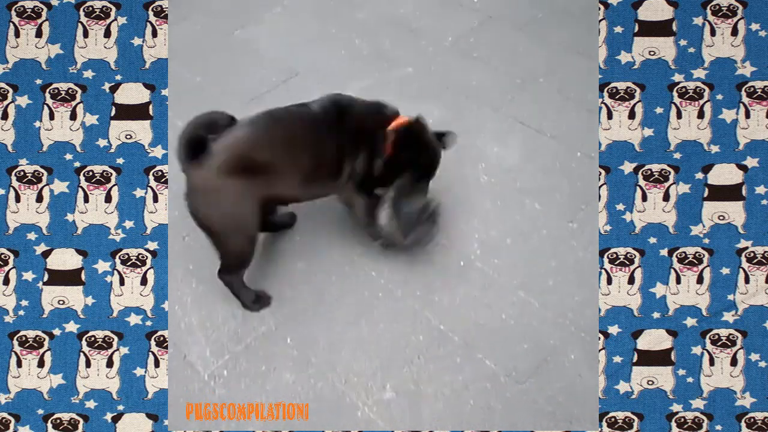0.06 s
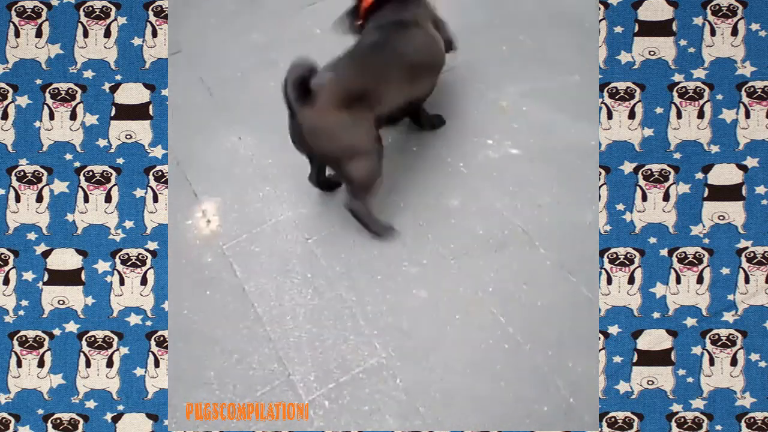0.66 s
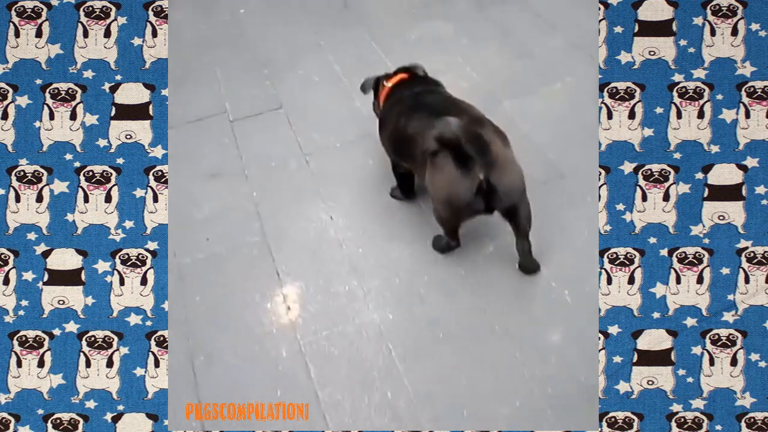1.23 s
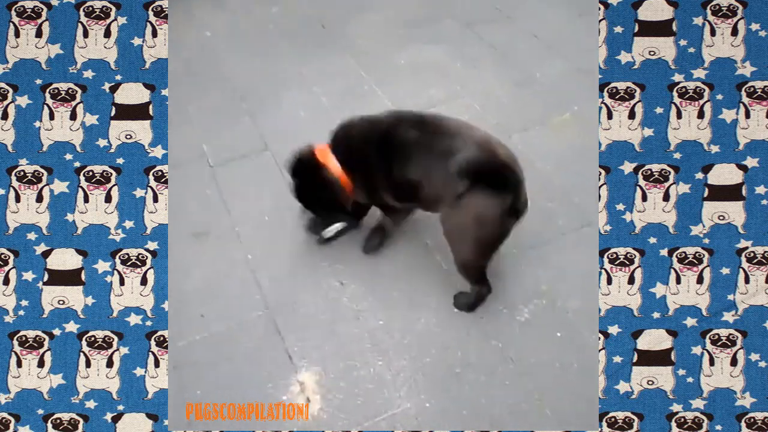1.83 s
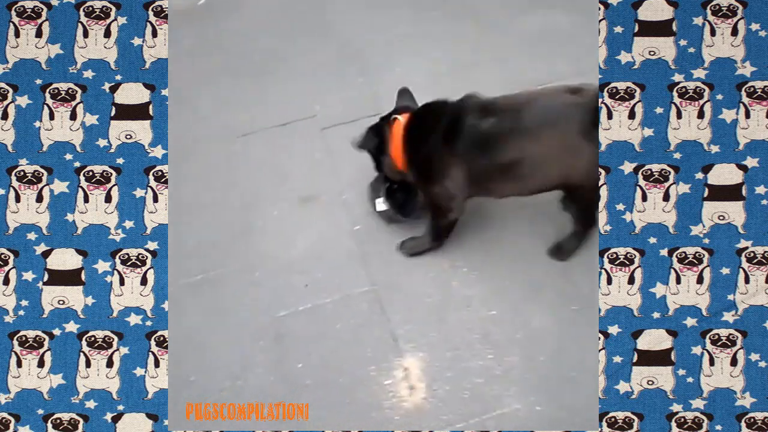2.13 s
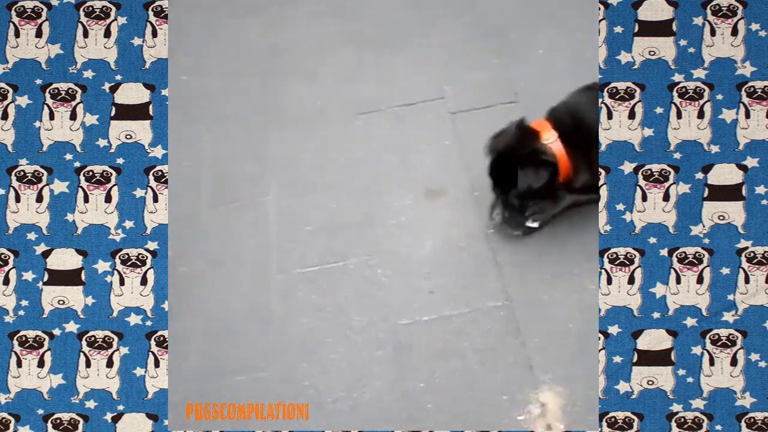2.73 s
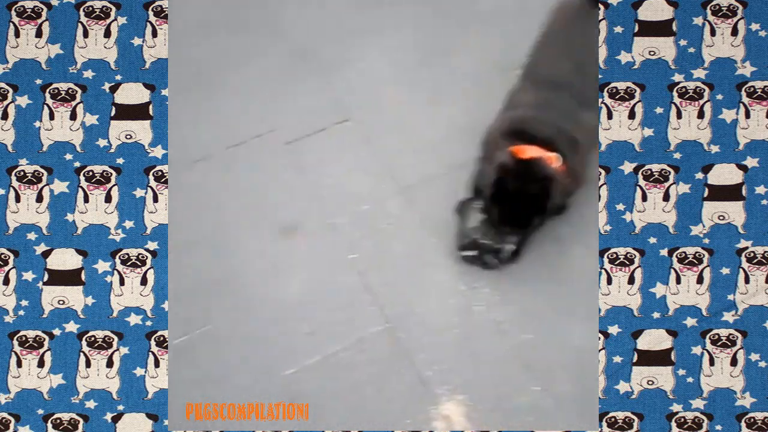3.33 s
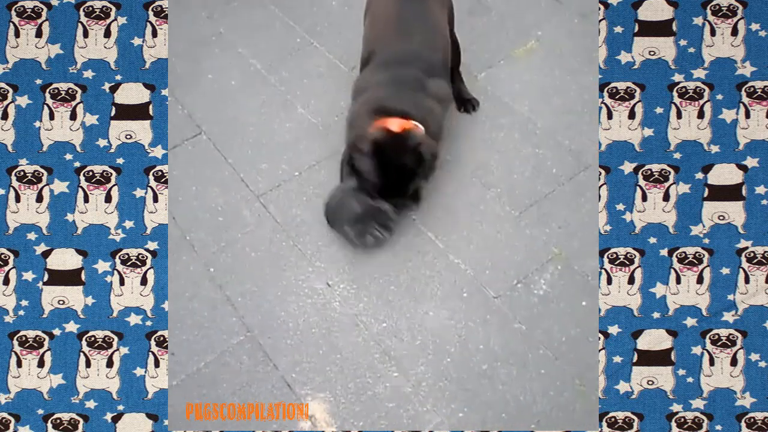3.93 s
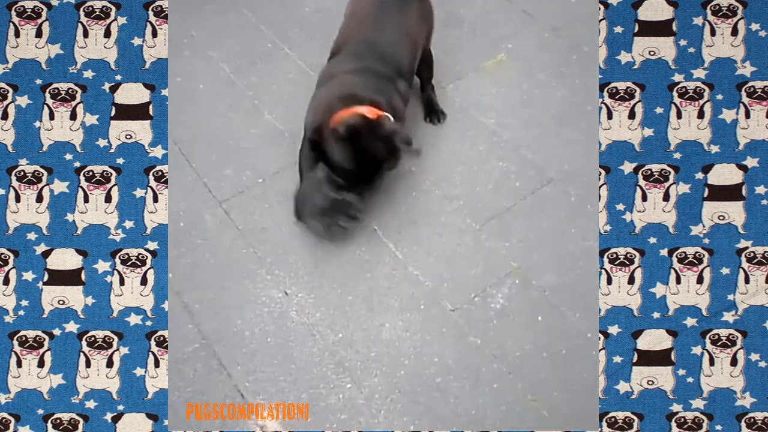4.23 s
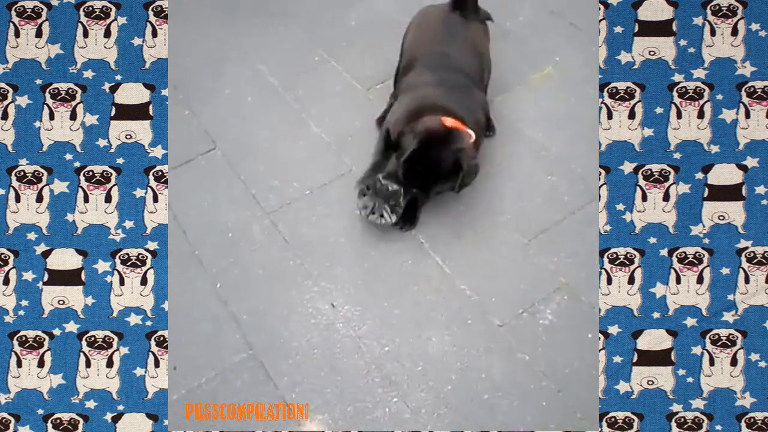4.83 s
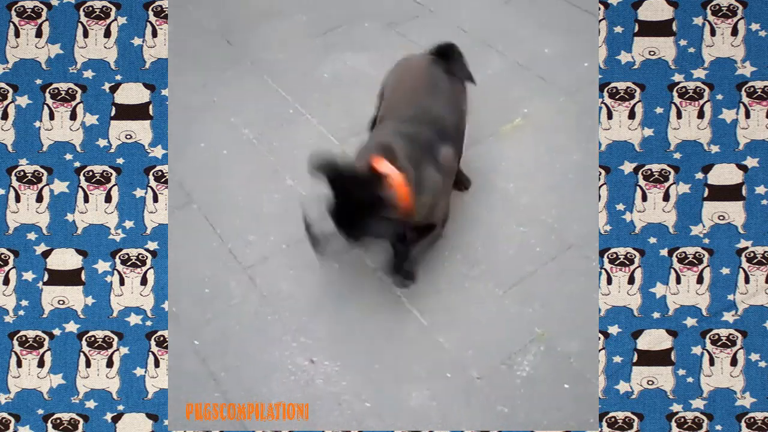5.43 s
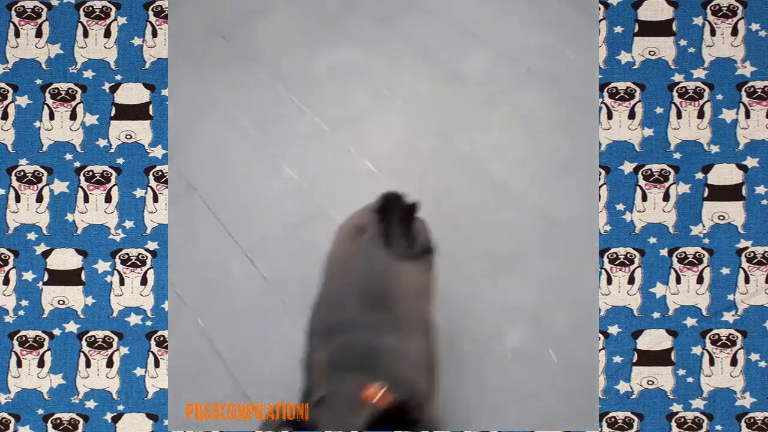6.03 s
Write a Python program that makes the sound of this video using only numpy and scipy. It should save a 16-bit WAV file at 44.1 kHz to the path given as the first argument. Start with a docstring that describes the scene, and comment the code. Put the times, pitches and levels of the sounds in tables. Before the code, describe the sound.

A small dog pushes a thin plastic cup over paving stones, with short gritty scrapes, light knocks and crackles.

```python
"""Dog pushing a cup round a yard

Close to the microphone, a small dog shoves a thin plastic cup over paving stones. The rim rasps over
the grit in short strokes and now and then squeaks on one note; between strokes the cup knocks and
crackles. Rasp and knocks sound through the cup's damped wall modes. The ground and the yard walls
throw back short echoes, and a low outdoor rumble lies underneath."""
import sys
import numpy as np
from scipy import signal
from scipy.fft import rfft, irfft
from scipy.io import wavfile

SR = 44100
rng = np.random.default_rng(int(sys.argv[2]) if len(sys.argv) > 2 else 0)


def unload_wav(signal):
    """Save mono or channel-first audio to the path in sys.argv[1] as 16-bit WAV at rate SR, clipped to [-1, 1]."""
    wavfile.write(
        sys.argv[1],
        SR,
        np.round(np.clip(np.atleast_2d(signal).T, -1, 1) * 32767).astype(np.int16),
    )


N = 272405
TIME = np.arange(N) / SR

# The cup's four registers: hollow, wall, rasp, grit hiss. Brightness favours hiss over hollow; body
# lifts the thin wall. (low edge [Hz], high edge [Hz], share of brightness, share of body)
REGISTERS = [(212, 702, -0.63, 0), (713, 1740, -0.099, 0.93), (1943, 5500, 0.31, 0.94),
             (6160, 32300, 0.54, 0.22)]


def from_db(db):
    """Decibels to gain."""
    return 10 ** (np.asarray(db) / 20)


def rms_one(x):
    """Scale to rms 1."""
    return x / np.sqrt(np.mean(x ** 2) + 1e-20)


def band(x, low_hz, high_hz, order=2):
    """Causal band-pass, its upper edge held below half the sample rate."""
    edges_hz = [low_hz, min(high_hz, SR / 2 - 1000)]
    return signal.sosfilt(signal.butter(order, edges_hz, "band", fs=SR, output="sos"), x + 1e-18)


def coloured_noise(spectrum):
    """Steady noise shaped by (Hz, dB) points and rolled off above the last; rms 1."""
    hz, level_db = np.transpose(spectrum)
    bins_hz = np.maximum(np.arange(N // 2 + 1) * SR / N, 1)
    gain = from_db(np.interp(np.log(bins_hz), np.log(hz), level_db))
    gain /= 1 + (bins_hz / (2 * hz[-1])) ** 2
    return rms_one(irfft(rfft(rng.standard_normal(N)) * gain, N))


def drift(rate_hz):
    """A smooth random wander that changes about rate_hz times a second; rms 1."""
    r = np.exp(-2 * np.pi * rate_hz / SR)
    return rms_one(signal.lfilter([1], [1, -2 * r, r * r], rng.standard_normal(N)))


def resonate(x, hz, width_hz):
    """One resonance with gain 1 at its peak."""
    r = np.exp(-np.pi * width_hz / SR)
    feedback = [1, -2 * r * np.cos(2 * np.pi * hz / SR), r * r]
    return signal.lfilter(np.array([1, 0, -1]) * (1 - r * r) / 2, feedback, x)


def yard():
    """The bed of the place: outdoor rumble and a soft wash of background noise."""
    # Course of the ambience: (time [s], rumble level [dB], wash level [dB])
    levels = [(0.0, -45, -40), (0.15, -52, -54), (0.27, -53, -53.5), (0.799, -46, -49), (1.15, -45, -46.5),
              (2.3, -45.5, -43.5), (2.92, -46, -48), (3.4, -47.5, -47), (3.8, -46.5, -48),
              (6.18, -46.5, -47.5)]
    # Spectrum of the rumble: (frequency [Hz], relative density [dB])
    rumble_spectrum = [(11, -2.5), (18, -2), (43, 5.5), (82, -2), (103, -7.5), (118, -10), (172, -22),
                       (200, -8.5), (260, -46), (440, -120)]
    # Spectrum of the wash: (frequency [Hz], relative density [dB])
    wash_spectrum = [(65, -22), (110, -1), (669, -7), (740, -7), (853, -5.5), (1090, -8.5), (1420, -9.5),
                     (1840, -16), (3250, -19.5), (3750, -19), (8780, -23.5), (14000, -19.5)]
    times, rumble_db, wash_db = np.transpose(levels)
    rumble = from_db(np.interp(TIME, times, rumble_db)) * coloured_noise(rumble_spectrum)
    wash = from_db(np.interp(TIME, times, wash_db)) * coloured_noise(wash_spectrum)
    return rumble + wash


def microphone_flutter(at_s, half_s, level_db, low_hz, high_hz):
    """One brief low flutter on the microphone."""
    swell = np.exp(-((TIME - at_s) / half_s) ** 2 / 2)
    return from_db(level_db) * swell * rms_one(band(rng.standard_normal(N), low_hz, high_hz))


def yard_echoes(x, tail_db, t60_s, dull_hz):
    """What the yard sends back to the microphone: early echoes and a short, dull scatter."""
    # Reflections off the ground and the walls: (delay [s], gain)
    echoes = [(.0043, 0.11), (0.0122, 0.11), (0.0133, 0.11), (0.0225, 0.053), (0.031, 0.034)]
    age = TIME[:SR // 2]
    fade_in = np.clip(age / .008, 0, 1)
    response = rng.standard_normal(len(age)) * from_db(-60 * age / t60_s) * fade_in
    response *= from_db(tail_db) / np.sqrt(np.sum(response ** 2))
    for delay_s, gain in echoes:
        response[int(delay_s * SR)] += gain
    response = signal.sosfilt(signal.butter(1, dull_hz, fs=SR, output="sos"), response)
    return signal.fftconvolve(x, response)[:N]


def cup(force):
    """The thin wall passes every frequency and rings briefly at its modes."""
    # Wall modes and the notches between them: (frequency [Hz], width [Hz], lift [dB])
    modes = [(236, 124, -6.5), (399, 134, 8), (520, 30, -5), (670, 20, 1.5), (773, 91, 4), (1080, 46, -2.5),
             (1060, 143, 8), (1252, 93, 5.5), (1453, 11.5, 11), (1650, 94, 1.5), (2424, 190, 4),
             (2710, 200, 4), (3195, 540, 4), (3560, 65, -0.5), (4500, 200, 2.5), (4900, 1800, 1.5),
             (12800, 1900, 3)]
    for hz, width_hz, lift_db in modes:
        force = force + (from_db(lift_db) - 1) * resonate(force, hz, width_hz)
    return force


def grit(grains_per_s, size_db, catch_db, catch_hz):
    """Grains of stone flick the rim at random, in clumps as it catches and slips."""
    clumps = from_db(catch_db * np.clip(drift(catch_hz), -2, 2))
    sizes = from_db(size_db * np.minimum(rng.exponential(1, N), 4))
    hits = rng.random(N) < grains_per_s / SR
    return hits * rng.choice([-1, 1], N) * sizes * clumps


def shoves(brightness_share, body_share):
    """Drive of one register: each shove bites, swells as the cup tips to a new colour, then coasts."""
    # The dog's shoves: (start [s], rise [s], fall [s], crest [dB], brightness at first touch [dB],
    # brightness at the crest [dB], body [dB])
    strokes = [(0.024, 0.07, 0.08, -41, 13, -2.5, -8.5), (0.109, 0.011, 0.032, -33.5, 2, 16, 1),
               (0.455, 0.028, 0.057, -33.5, 12, 5.5, 1), (0.568, 0.027, 0.029, -26.5, -9, 8.5, -3),
               (0.951, .024, .051, -36.5, -29, -4, 7), (1.04, 0.057, 0.038, -33, -10, 6, 4),
               (1.466, 0.048, 0.048, -35, -10, 8.5, 9), (1.578, 0.02, 0.2, -41.5, -12, 0.5, 4.5),
               (1.682, 0.012, 0.06, -37, 14, 22.5, -1.5), (1.739, 0.021, 0.045, -32.5, 8, 6, -6),
               (1.814, 0.08, 0.069, -30, -3.5, -5.5, 6.5), (1.879, 0.068, 0.033, -28, 17, 22, 2.5),
               (1.99, 0.064, 0.096, -30.5, 16, 2, -2.5), (2.103, 0.096, 0.018, -48, -25, 6, 5),
               (2.231, 0.077, 0.51, -46, 8, -2.5, -1.5), (2.402, 0.023, 0.055, -47.5, -6, -7, 7.5),
               (2.564, 0.079, .033, -49.5, 16, -16, -1), (2.685, 0.077, 0.027, -42.5, 4, 0.5, 4),
               (2.774, 0.04, .046, -45, -14, -6, 9.5), (3.018, 0.0073, 0.071, -28, -13, 5.5, -1.5),
               (3.163, 0.025, .053, -40, 10, 1, 3.5), (3.206, 0.06, .097, -31, -5, -5, 6),
               (3.441, 0.038, 0.18, -46.5, 14, -6, 1.5), (3.598, .029, 0.087, -47.5, 11, -9, 5),
               (3.817, 0.062, 0.14, -44, -1, -2.5, 2), (4.094, 0.073, .12, -41, 1, 5.5, -1.5),
               (4.33, .11, 0.039, -50, 12, -9, 8), (4.576, .035, 0.077, -36.5, 6, -11, 7),
               (4.693, 0.03, 0.16, -42, 9, -2.5, 6.5), (4.788, 0.043, .043, -42, 13, -8, 1),
               (4.886, 0.077, 0.051, -34.5, -1, -1, 2.5), (5.098, .047, .073, -25.5, 6, -0.5, 1),
               (5.183, 0.024, 0.018, -32.5, -6, -2.5, 2), (5.348, 0.046, 0.085, -24.5, 5, 1.5, -5.5),
               (5.394, 0.051, 0.019, -28.5, 25, 10.5, 6.5), (5.594, 0.034, 0.033, -53, 8, 19, 2.5),
               (5.728, 0.033, 0.24, -50, 4, 13.5, -7)]
    swell_db, fall_db, touch_s = 14, 19.5, 0.0027
    power = np.zeros(N)
    for start_s, rise_s, fall_s, crest_db, first_db, last_db, body_db in strokes:
        on = (TIME > start_s) & (TIME < start_s + rise_s + 3 * fall_s)
        age = TIME[on] - start_s
        touch = np.minimum(age / touch_s, 1)
        tipped = np.clip(age / rise_s, 0, 1)
        coasted = np.maximum(age - rise_s, 0) / fall_s
        # Powers above 1 round the crest.
        push_db = crest_db - swell_db * (1 - tipped) ** 1.45 - fall_db * coasted ** 1.14
        bite_db = 7.5 * np.exp(-age / 0.0049)  # the rim digs in as it touches down
        brightness_db = first_db + (last_db - first_db) * tipped
        colour_db = brightness_share * brightness_db + body_share * body_db
        power[on] += (touch * from_db(push_db + bite_db + colour_db)) ** 2
    return np.sqrt(power)


def loose_grit(level_db, low_hz, high_hz, linger_s):
    """Stray grains tick faintly under the cup and the paws while the dog is busy with it."""
    pole = np.exp(-1 / (linger_s * SR))
    push = signal.lfilter([1 - pole], [1, -pole], shoves(brightness_share=0, body_share=0))
    busy = np.minimum(push / from_db(-46), 1) ** 0.6
    ticks = grit(grains_per_s=160, size_db=2.2, catch_db=2.5, catch_hz=12)
    return from_db(level_db) * busy * rms_one(band(cup(ticks), low_hz, high_hz))


def brief_tones(gain_db):
    """Brief narrow tones: squeaks in the scrapes, rings after knocks, a low thump and a thin hiss."""
    # Brief tones: (centre time [s], half length [s], pitch [Hz], width [Hz], relative level [dB])
    tones = [(0.022, 0.00078, 2900, 450, -17), (1.482, 0.014, 1270, 100, -43),
             (1.765, 0.0091, 1910, 346, -29.5), (1.894, 0.013, 1110, 130, -20),
             (1.946, 0.0037, 1173, 99, -16.5), (1.939, 0.012, 5100, 432, -19.5),
             (3.035, 0.0064, 425, 111, -20), (3.04, 0.008, 3030, 696, -22), (3.264, 0.049, 1146, 86, -30.5),
             (3.965, 0.0024, 870, 217.4, -21), (4.634, 0.023, 1165, 97, -29),
             (4.753, 0.011, 2510, 402, -32), (5.153, 0.04, 1490, 74, -40), (5.411, 0.017, 655, 44.5, -26.5),
             (5.407, 0.021, 145, 90, -29.5), (5.781, 0.034, 4660, 497, -43.5)]
    out = np.zeros(N)
    for at_s, half_s, hz, width_hz, level_db in tones:
        near = np.abs(TIME - at_s) < 4 * half_s
        swell = np.exp(-((TIME[near] - at_s) / half_s) ** 2 / 2)
        noise = rng.standard_normal(N)[near]
        tone = resonate(resonate(noise, hz, 2 * width_hz), hz, 2 * width_hz)
        out[near] += from_db(level_db + gain_db) * swell * rms_one(tone)
    return out


def knocks(register_db, crackle, ring_db, size=2048):
    """Blows, sharp or soft, each with a short crackle; the struck spot rings at its own pitch."""
    # The cup hits the stone or its wall snaps:
    # (time [s], ring pitch [Hz], relative level [dB], brightness [dB], body [dB])
    blows = [(0.02, 2890, -35.5, -2.5, 12.5), (0.1026, 6960, -41, 28, 7.5), (0.1161, 2970, -37.5, 0, 4),
             (0.1234, 11500, -35.5, 22.0, 8.5), (0.4565, 2880.0, -48, 14, 3), (0.4872, 2550.0, -50, 6, 14),
             (0.548, 1100.0, -43, -16, 6.0), (0.5695, 1400, -36.0, 9, 3.5), (0.707, 1840, -57.5, -15, 20),
             (0.952, 1236, -40.5, -1, 3.0), (0.9761, 900.0, -44, -6.0, 14), (1.4719, 1120.0, -49, -18, 0),
             (1.4866, 1270, -41.5, -15, 13.5), (1.6822, 8980, -35, 4.5, 7.5),
             (1.6898, 11600, -40, 34.5, -9), (1.76, 2040, -43, -15, 15), (2.1014, 726, -45.0, -20, 10),
             (2.121, 11110.0, -37.5, 0, 1.5), (2.1564, 820, -46, -18, 9), (2.1835, 4700, -36.5, 13.5, 2),
             (2.2672, 4500.0, -48, 16, -1), (2.28, 2610.0, -48, -4, 5.5), (2.4139, 3400.0, -38, -6, 9),
             (2.6197, 11990.0, -45.5, 13, 5.5), (2.6356, 3420.0, -45.5, 10, 2),
             (2.7347, 706, -50, -19.5, -9), (3.0184, 2800.0, -54, -4.0, 7.0), (3.03, 2940, -35.5, 4.0, 12),
             (3.0479, 2560, -36, 20, 11), (3.067, 4470, -42.5, 24.0, 0), (3.169, 2460.0, -43, -12, -6),
             (3.212, 4600.0, -41, 12, -2), (3.2321, 1200.0, -35, -3, 0), (3.3315, 1180, -32, 6.5, -3),
             (3.4787, 1090, -46.5, -17, 7.0), (3.616, 5640, -46.5, 14, 4.5), (3.6653, 2950, -32.5, 14.5, 6),
             (3.675, 2920.0, -33, 7, -6), (3.952, 4200, -35, 8, 10.5), (3.9619, 1080.0, -39.5, -9, -11),
             (4.062, 880.0, -43, 5, 5), (4.0699, 1270.0, -40.5, -3, 1.5), (4.1169, 724, -51, -17.5, 14.5),
             (4.1708, 1690, -33, 5, 0), (4.2125, 4800, -32.5, 9, -9), (4.2846, 1160, -44, 2, -0.5),
             (4.399, 2900, -37.5, 28, 8.5), (4.4017, 9150, -39, 33, 9), (4.4057, 3050, -27.5, -1, -1.5),
             (4.516, 2850, -54, -7, 9.5), (4.583, 2510, -36.5, -3, -1), (4.644, 1220, -28.5, 1, 1.5),
             (4.6971, 5270, -34.5, 15, 6.0), (4.755, 2650, -45.0, 15, -3), (4.799, 2520, -45, 24, -5.5),
             (4.866, 2930, -48.5, 8.0, 6.5), (4.891, 1180.0, -56, 1, 2), (4.948, 2600.0, -36, -16, 10.5),
             (4.9586, 1500, -29.5, 1.5, 7), (5.0621, 4500, -45, 20, 4.5), (5.1, 11800, -41, 21, 5.0),
             (5.313, 730.0, -51.0, -16, 5), (5.3321, 2170, -36.5, 6, -5.5), (5.3518, 11700, -41, 19, 7.5),
             (5.377, 6200.0, -32, 26, 8.5), (5.594, 3650, -46.5, -5, 9.5)]
    out = np.zeros(N + size)
    age = TIME[:size]
    buckling = np.exp(-(age / .0015) ** 2) + .13 * np.exp(-age / .004)
    force = crackle * rng.standard_normal((len(blows), size)) * buckling
    force[:, 0] += 1  # the impact itself
    wall = cup(force)
    split_blows = np.stack([band(wall, low, high, order=3) for low, high, _, _ in REGISTERS], axis=1)
    for (at_s, ring_hz, level_db, brightness_db, body_db), parts in zip(blows, split_blows):
        blow = np.zeros(size)
        for trim_db, (_, _, brightness_share, body_share), part in zip(register_db, REGISTERS, parts):
            colour_db = brightness_share * brightness_db + body_share * body_db
            blow += from_db(trim_db + level_db + colour_db) * rms_one(part)
        # A softer contact lasts longer: the top drops an octave for each 14.5 dB less brightness.
        top_hz = np.clip(6550 * 2 ** (brightness_db / 14.5), 1000, .45 * SR)
        blow = signal.lfilter(*signal.butter(2, top_hz, fs=SR), blow)
        ring = from_db(ring_db) * resonate(blow, ring_hz, width_hz=350 + ring_hz / 10)
        start = int(at_s * SR)
        out[start:start + size] += blow + ring
    return out[:N]


def hollow_echo(x, lag_s, swing, echo_gain, tilt_hz):
    """Sound also echoes inside the cup's hollow; as the cup tips, the lag and colour shift."""
    delay_s = lag_s * np.exp(swing * drift(tilt_hz))
    return x + echo_gain * np.interp(TIME - delay_s, TIME, x)


def scraping(register_db, stones_db):
    """Fine grit and a few coarse stones rattle the cup; tilt and push decide which registers speak."""
    fine = grit(grains_per_s=6000, size_db=3.4, catch_db=1.6, catch_hz=90)
    coarse = grit(grains_per_s=170, size_db=2.0, catch_db=2.0, catch_hz=40)
    rasp = cup(rms_one(fine) + from_db(stones_db) * rms_one(coarse))
    rasp = hollow_echo(rasp, lag_s=.0011, swing=.25, echo_gain=.4, tilt_hz=1.5)
    out = np.zeros(N)
    for trim_db, (low_hz, high_hz, brightness_share, body_share) in zip(register_db, REGISTERS):
        register = rms_one(band(rasp, low_hz, high_hz, order=3))
        out += from_db(trim_db) * shoves(brightness_share, body_share) * register
    return out


def scene():
    """One microphone in the yard: the cup up close, its echoes and the ambience behind it."""
    plastic = scraping(register_db=[-0.097, 0.1, -0.23, 0.43], stones_db=-12.5)
    plastic += brief_tones(gain_db=-1.0)
    plastic += knocks(register_db=[-10.0, -9.5, -10.0, -9.0], crackle=0.83, ring_db=3.5)
    plastic += loose_grit(level_db=-52.5, low_hz=900, high_hz=13100, linger_s=0.017)
    ambience = yard()
    flutter = microphone_flutter(at_s=1.648, half_s=0.018, level_db=-30.5, low_hz=24, high_hz=57.6)
    echoes = yard_echoes(plastic, tail_db=-9.5, t60_s=0.15, dull_hz=5300)
    return (ambience + flutter + echoes + plastic)[None]


def record(dry):
    """After the microphone, the highest peaks are rounded and the top is cut steeply."""
    ceiling, cutoff_hz = .75, 13950
    rounded = ceiling * np.tanh(dry / ceiling)
    return signal.sosfilt(signal.ellip(12, .1, 70, cutoff_hz, fs=SR, output="sos"), rounded)


dry = scene()
out = record(dry)
unload_wav(out)
```